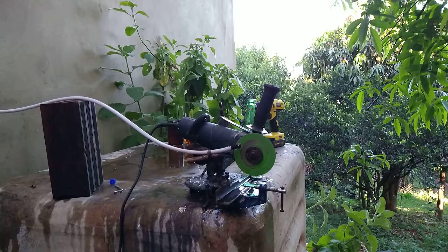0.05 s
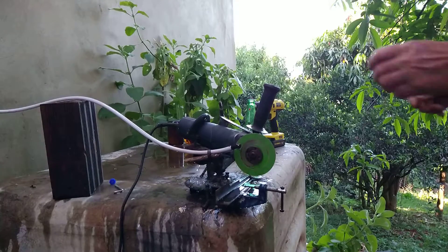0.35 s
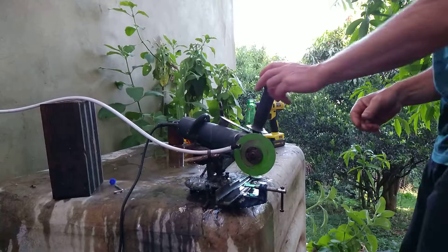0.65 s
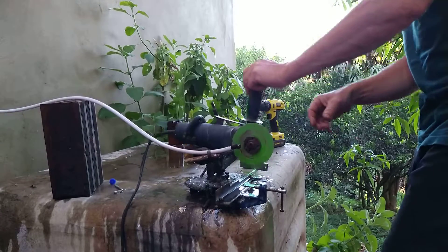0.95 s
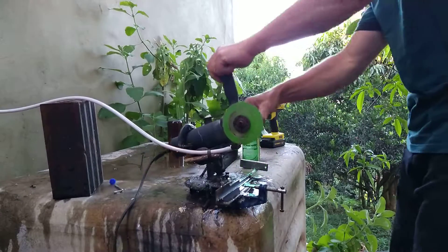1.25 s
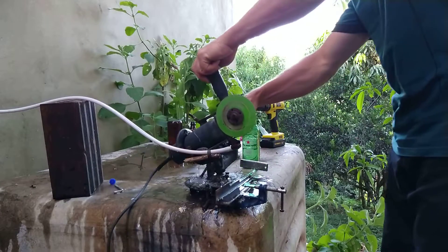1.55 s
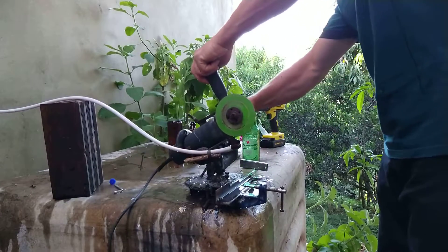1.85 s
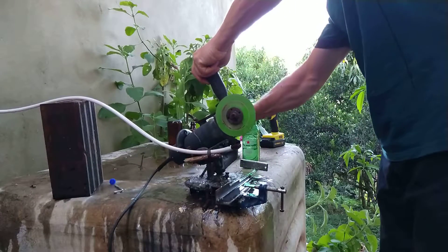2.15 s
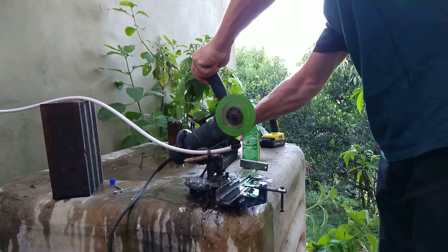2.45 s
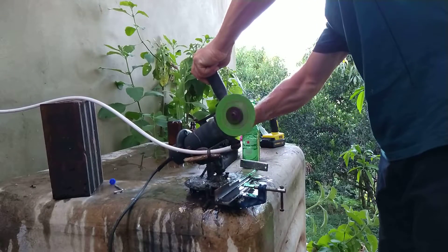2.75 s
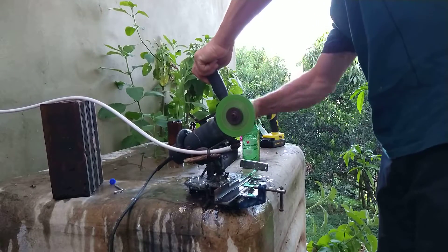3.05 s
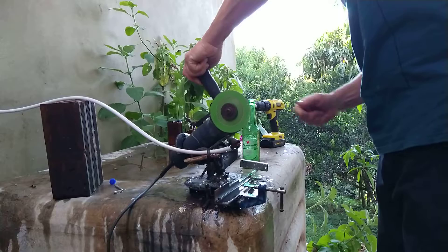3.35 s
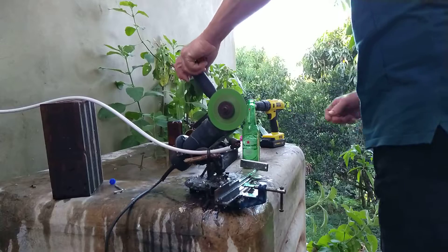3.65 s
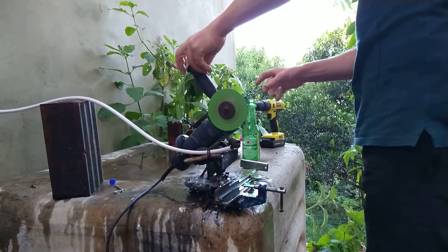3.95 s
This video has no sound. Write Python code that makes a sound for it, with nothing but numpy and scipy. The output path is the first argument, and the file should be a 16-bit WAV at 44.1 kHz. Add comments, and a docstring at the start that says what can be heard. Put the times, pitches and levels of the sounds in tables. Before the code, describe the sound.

Soft handling noises in a garden, then an angle grinder starts, rattling into a rising whine.

```python
"""Angle grinder starting in a garden

Over a quiet garden and a far bird, a man rustles up to a grinder clamped on a stone bench by a wall,
grips it with clicks and a bump, and switches it on. Torque pulses at twice the mains frequency rattle
the gears, whose impacts ring the housing. As the slotted disc spins up the rattle eases, and rushing
air, disc hum and motor whine take over."""
import sys
import numpy as np
from scipy import signal
from scipy.fft import rfft, irfft
from scipy.io import wavfile
from scipy.ndimage import uniform_filter1d

SR = 44100
rng = np.random.default_rng(int(sys.argv[2]) if len(sys.argv) > 2 else 0)


def to_wav(s):
    """Save 16-bit WAV."""
    ch = np.atleast_2d(s).T  # columns
    pcm = np.round(np.clip(ch, -1, 1) * 32767)  # PCM
    wavfile.write(sys.argv[1], SR, pcm.astype(np.int16))


N = 176400
T, F = np.arange(N) / SR, np.arange(N // 2 + 1) * SR / N + 1e-3
START_S, START_RISE_S, TORQUE_HZ, CHATTER_HZ = 2.874, 0.0029, 120, 48
GEAR_RATIO, ARMATURE_SLOTS, DISC_SLOTS = 30 / 11, 12, 7
# phase difference between the channels (frequency [Hz], lead of the left [rad])
PHASE_LEAD = [(200, 0), (1210, 1.02), (2300, 0.42), (4700, 2.0), (8000, 3)]
# level difference between the channels (frequency [Hz], left minus right [dB])
BALANCE = [(110, 1.5), (200, -3), (380, 1.5), (1290, -1.5), (4400, -1), (8300, 7.5), (13000, 2.5)]


def undb(db):
    """Amplitude ratio of a level in decibels."""
    return 10 ** (np.asarray(db) / 20)


def unit(x):
    """Normalisation to rms 1."""
    return x / np.sqrt(np.mean(x ** 2))


def noise(channels=2):
    """Uncorrelated white noises."""
    return rng.standard_normal((channels, N))


def per_hz(points):
    """Interpolation of (frequency [Hz], value) points on a logarithmic axis."""
    hz, value = np.array(points, float).T
    return np.interp(np.log(F), np.log(np.maximum(hz, 1)), value)


def colour(x, gain):
    """Spectral shaping by a gain per frequency, to rms 1."""
    return unit(irfft(rfft(x) * gain, N))


def resonance(hz, width_hz):
    """Frequency response of a damped oscillator."""
    return 1 / (1 + 1j * (F ** 2 - hz ** 2) / (F * width_hz))


def walk(hz):
    """Low-pass noise: a smooth random wander of rms 1."""
    return colour(noise(channels=1)[0], np.exp(-(F / hz) ** 2))


def pan(db):
    """Left and right gains for a level difference."""
    return undb(np.array([[.5], [-.5]]) * db)


def grains(per_s, spread_db):
    """A Poisson train of tiny impacts of uneven size."""
    impacts = (rng.random(N) < per_s / SR) * rng.choice([-1, 1], N)
    return impacts * undb(spread_db * np.minimum(rng.exponential(size=N), 5))


def fade(start, t60):
    """Free decay: a sudden onset, then 60 dB down in t60 seconds."""
    return (T >= start) * undb(-60 * np.maximum(T - start, 0) / t60)


def stereo(x):
    """Partial coherence: two unrelated sounds become a partly alike left and right with a flat sum."""
    # likeness of the channels (frequency [Hz], coherence [0-1])
    coherence = [(250, 2), (640, 0.7), (5000, 0.32), (15000, 0.12)]
    like = np.clip(per_hz(coherence), 0, .99)
    gain = pan(per_hz(BALANCE)) * np.exp(np.array([[.5j], [-.5j]]) * per_hz(PHASE_LEAD))
    shared, apart = gain * np.sqrt(1 + like), gain * np.sqrt(1 - like) * np.array([[1], [-1]])
    a, b = rfft(x)
    return irfft((a * shared + b * apart) / np.hypot(abs(shared.mean(0)), abs(apart.mean(0))), N)


def yard(x, scatter_db=-5):
    """Specular reflection from the wall and diffuse scattering from bench and plants."""
    wall_s, wall_db, size = .008, -18, SR // 3
    response = unit(noise()[:, :size] * fade(wall_s, t60=0.24)[:size]) * undb(scatter_db) / np.sqrt(size)
    response[:, 0] += 1
    response[:, int(wall_s * SR)] += undb(wall_db)
    return signal.fftconvolve(x, response, axes=1)[:, :N] / np.sqrt(np.sum(response ** 2) / 2)


def garden():
    """Ambient noise: a low outdoor murk and a far narrow-band hum that swells once."""
    # outdoor spectrum (frequency [Hz], relative density [dB])
    spectrum = [(22, -38), (45, -8.5), (133, -3.5), (284, -12.5), (486, -11.5), (1980, -29), (15800, -44)]
    murk = stereo(colour(noise(), undb(per_hz(spectrum)))) * undb(-65)
    hum = colour(noise(channels=1)[0], resonance(hz=137, width_hz=14) ** 2) * undb(-66)
    return murk + hum * np.exp(-((T - 2.48) / 0.35) ** 2)


def bird():
    """Frequency modulation: a far bird's short, arched hoots and thin rising whistles."""
    # hoots (time [s], level [dB])
    hoots = [(1.31, -69), (1.598, -75), (1.722, -68), (2.01, -75), (2.128, -69)]
    # whistles (time [s], level [dB], relative third harmonic [dB])
    whistles = [(1.601, -80.5, -4), (2.001, -81, -22)]
    hoot_top_hz, hoot_s, whistle_top_hz, whistle_s = 1000, 0.041, 1530, 0.19
    out = 0
    for s, db in hoots:
        arch = np.sin(np.pi * np.clip((T - s) / hoot_s, 0, 1))
        hz = hoot_top_hz * (1 + 0.18 * (arch - 1))
        out = out + undb(db) * 2 * arch * np.sin(2 * np.pi * np.cumsum(hz) / SR)
    for s, db, third_db in whistles:
        along = np.clip((T - s) / whistle_s, 0, 1)
        hz = whistle_top_hz * (1 - 0.17 * (1 - along) ** 2 + .015 * walk(140))
        phase = 2 * np.pi * np.cumsum(hz) / SR
        tone = np.sin(phase) + undb(third_db) * np.sin(3 * phase)
        out = out + undb(db) * 2 * np.sin(np.pi * along) * tone
    return yard(out * np.ones((2, 1)))


def handling():
    """Friction and impact: steps and clothes rustle, the hands click and bump on the tool."""
    # swells of rustling (time [s], rise [s], decay [s], level [dB])
    rustles = [(.02, 0.13, 0.13, -53.5), (.27, 0.052, 0.13, -61), (.46, 0.056, 0.056, -48),
               (0.604, 0.041, 0.083, -50), (.77, 0.1, 0.26, -60), (1.25, 0.035, 0.038, -54.5)]
    # rustle spectrum (frequency [Hz], relative density [dB])
    spectrum = [(530, -42), (900, -15), (2580, -2), (8270, 1), (11000, 1), (15800, -25)]
    # sharp clicks (time [s], level [dB], centre [Hz])
    clicks = [(0.057, -41.5, 4800), (0.2099, -47, 3700), (0.399, -37, 8240), (.416, -41, 8380),
              (0.5813, -45, 5100), (1.057, -56.5, 4500), (1.19, -53, 9300), (1.491, -55, 8700),
              (2.5095, -57, 2490), (2.655, -51.5, 2850)]
    # dull bumps (time [s], level [dB], centre [Hz])
    bumps = [(0.593, -46.5, 270), (1.215, -44.5, 326)]
    power = sum((undb(db) * np.exp(-np.maximum((s - T) / rise, (T - s) / decay))) ** 2
                for s, rise, decay, db in rustles)
    crackle = np.array([grains(per_s=8500, spread_db=4.5) for _ in range(2)])
    out = colour(crackle, undb(per_hz(spectrum))) * np.sqrt(power) * undb(2.3 * walk(60)) * pan(5)
    click_noise, bump_noise = noise(), stereo(noise())
    for s, db, hz in clicks:
        out += colour(click_noise, resonance(hz, .5 * hz)) * undb(db) * fade(s, t60=.022) * pan(5)
    for s, db, hz in bumps:
        out += colour(bump_noise, resonance(hz, 0.8 * hz) ** 2) * undb(db) * fade(s, t60=0.095)
    shuffle = colour(stereo(noise()), resonance(hz=297, width_hz=330)) * undb(-61)
    out += shuffle * np.clip(2 * (1 - T), 0, 1)  # gone after the first second
    return yard(out, scatter_db=-10)


def switch():
    """Impact transient: the switch snaps over in a broad, fast-decaying burst."""
    burst = stereo(colour(noise(), resonance(hz=2600, width_hz=3700)))
    return burst * undb(-26) * fade(start=2.8655, t60=0.04)


def flicker(x):
    """Random amplitude modulation: narrow patches of the treble swell and fade independently."""
    depth_db, above_hz = 1.7, 2200
    hz, _, bands = signal.stft(x, SR, nperseg=512)
    field = rng.standard_normal(bands.shape[1:])
    for _ in range(2):
        field = uniform_filter1d(uniform_filter1d(field, size=3, axis=0), size=14, axis=1)
    gain = undb(depth_db * unit(field) * (hz[:, None] > above_hz))
    return signal.istft(bands * gain, SR)[1][:, :N]


def brushes(share, torque):
    """Sparking: the brushes sizzle most part-way up, where both current and speed are high."""
    sparks = colour(yard(torque * noise()), resonance(hz=9500, width_hz=3000) ** 2)
    return sparks * undb(-15) * share ** 2 * np.sqrt(np.maximum(1 - share, 0))


def gears(share, torque):
    """Impact excitation: teeth knock with each torque pulse and ring the housing, less so at speed."""
    # rattle spectrum (frequency [Hz], relative density [dB])
    spectrum = [(35, -55), (62, -41), (113, -11.5), (227, -14), (280, 3), (353, -9), (416, -2), (745, -4.5),
                (1720, -12.5), (4180, -7), (5660, -11.5), (10400, -6.5), (15800, -30.5)]
    # modes of the gear housing (frequency [Hz], bandwidth [Hz], relative level [dB])
    modes = [(3413, 9.6, 1), (3890, 370, 1), (4243, 230, 2), (5440, 30, -13)]
    # jolts as the gears take up their slack (time [s], lift [dB])
    jolts = [(2.904, 4), (2.927, 3.5), (3.05, 2.5), (3.115, 4)]
    knocks = yard(torque * np.array([grains(per_s=3500, spread_db=3) for _ in range(2)]))
    housing = sum(undb(db) * resonance(hz, width) / np.sqrt(width) for hz, width, db in modes)
    rattle = undb(-18.2) * colour(knocks, undb(per_hz(spectrum))) + undb(-20.5) * colour(knocks, housing)
    easing_db = -9.3 * share ** 2
    jolt_db = sum(db * np.exp(-((T - s) / 0.0097) ** 2) for s, db in jolts)
    chatter_db = 1.6 * colour(noise(channels=1)[0], resonance(CHATTER_HZ, CHATTER_HZ / 2))
    return rattle * undb(easing_db + jolt_db + chatter_db)


def air(share, turns):
    """Flow noise: air from fan and disc, chopped by the disc's slots, grows as a power of speed."""
    # flow spectrum (frequency [Hz], relative density [dB])
    spectrum = [(35, -52), (60, -26), (139, -50), (180, -17), (227, -18), (425, -14.5), (537, -23),
                (817, -10.5), (1270, -7.5), (1530, -11.5), (2750, -2.5), (7150, -11.5), (9240, -9.5),
                (15800, -18.5)]
    chop = 1 + 0.4 * np.cos(2 * np.pi * DISC_SLOTS * turns)
    rush = stereo(colour(yard(noise() * chop), undb(per_hz(spectrum))))
    return rush * undb(-16.5 + 0.71 * walk(28)) * share ** 2.2


def whine(speed, share, turns):
    """Rotational orders: unbalance, motor shaft, disc slots and armature slots sing through resonances."""
    # tones, each lifted near a resonance of the tool
    # (order [cycles per disc turn], base level [dB], resonance [Hz], half-width [Hz], lift [dB])
    tones = [(1, -38.5, 200, 55, 5), (GEAR_RATIO, -39.5, 315, 62, 14), (7, -32.5, 1115, 60, 9),
             (GEAR_RATIO * ARMATURE_SLOTS, -38.5, 5530, 240, 17), (48.5, -45, 8950, 150, 14),
             (2 * GEAR_RATIO * ARMATURE_SLOTS, -52, 9350, 500, 25),
             (3 * GEAR_RATIO * ARMATURE_SLOTS, -52, 13950, 700, 23)]
    out = 0
    for order, db, peak_hz, width_hz, lift_db in tones:
        rough = .3 * (order % 1 > 0)  # tones from behind the gears shake; the disc's own stay clean
        hz = order * speed
        level = undb(db + lift_db / (1 + ((hz - peak_hz) / width_hz) ** 2) + 1.6 * walk(6.8))
        lead = np.array([[.5], [-.5]]) * np.minimum(np.interp(hz, F, per_hz(PHASE_LEAD)), 1)
        sides = pan(np.interp(hz, F, per_hz(BALANCE)))
        shake = (1 + rough * walk(CHATTER_HZ)) / np.hypot(1, rough)
        phase = 2 * np.pi * order * turns + rough * walk(CHATTER_HZ)
        out = out + np.sqrt(2) * level * shake * sides * np.sin(phase + lead)
    return out * share


def disc_ring(turns):
    """Natural vibration: the disc's own ring, a narrow band of noise, climbs as it spins."""
    rest_hz, cycles_per_turn, width_hz = 6160, 3.3, 28
    phase = 2 * np.pi * (rest_hz * T + cycles_per_turn * turns)
    ring = [walk(width_hz) * np.sin(phase) + walk(width_hz) * np.cos(phase) for _ in range(2)]
    return undb(-34.5) * np.array(ring)


def grinder():
    """Forced vibration: once switched on, the motor spins up, pulsing at twice the mains frequency."""
    # run-up of the disc (time [s], speed [turns/s])
    run_up = [(2.87, 74), (3.09, 120), (3.19, 141), (3.28, 152.2), (3.38, 161.4), (3.48, 168.5),
              (3.6, 175.4), (3.8, 183.3), (3.97, 187.6)]
    speed = np.interp(T, *np.array(run_up).T)
    share, turns = speed / speed.max(), np.cumsum(speed) / SR  # fraction of top speed, disc angle
    running = np.clip((T - START_S) / START_RISE_S, 0, 1)
    pulse_depth = np.clip(0.39 * (1.4 - share), 0, 1)
    torque = 1 + pulse_depth * np.cos(2 * np.pi * TORQUE_HZ * (T - START_S - START_RISE_S))
    snap = switch()
    roar = flicker(stereo(gears(share, torque) + brushes(share, torque)) + air(share, turns))
    mains_hum = undb(-52) * np.sin(2 * np.pi * TORQUE_HZ * T)
    return snap + running * (roar + whine(speed, share, turns) + disc_ring(turns) + mains_hum)


def scene():
    """Superposition of garden, bird, handling and grinder."""
    return garden() + bird() + handling() + grinder()


def record(dry):
    """Saturation and band limiting: peaks clip at full scale and a steep low-pass cuts the top."""
    top_hz = 15700
    return signal.sosfilt(signal.ellip(10, .2, 80, top_hz, fs=SR, output="sos"), np.clip(dry, -1, 1))


dry = scene()
out = record(dry)
to_wav(out)
```